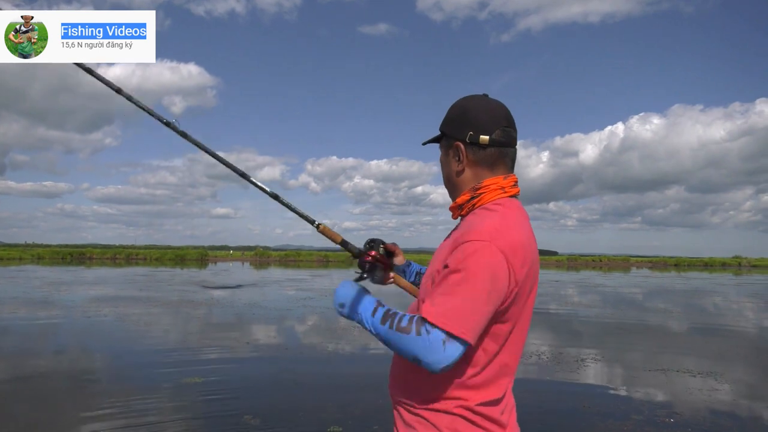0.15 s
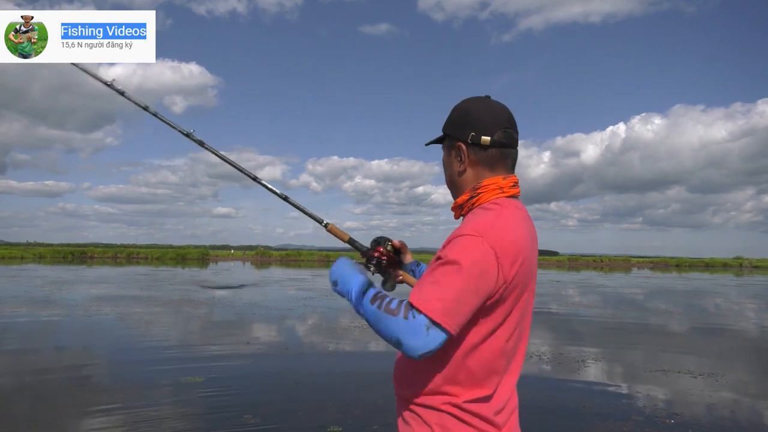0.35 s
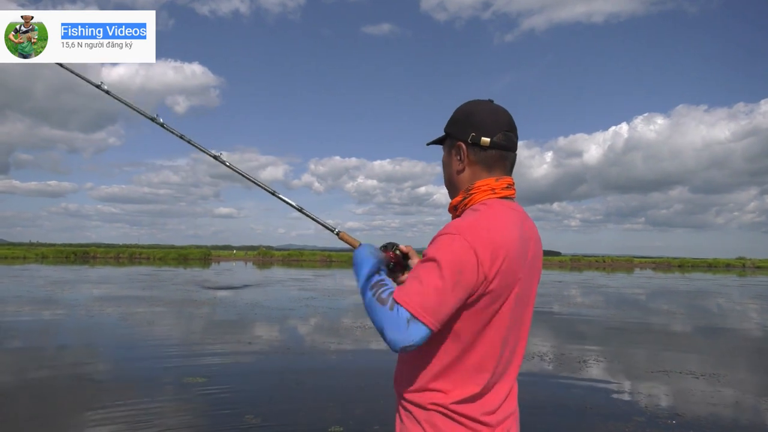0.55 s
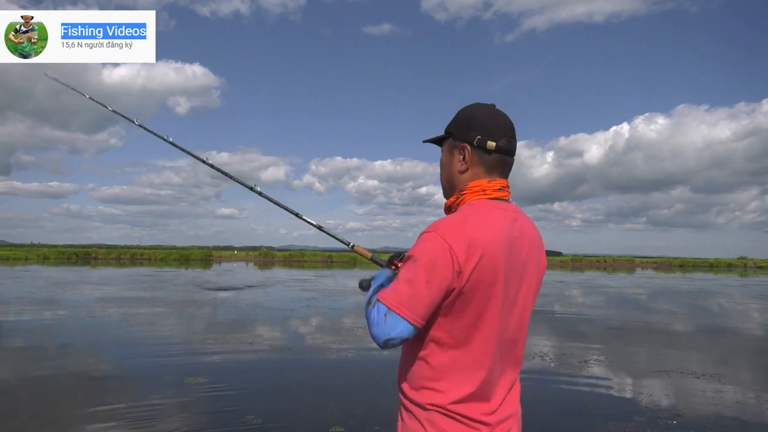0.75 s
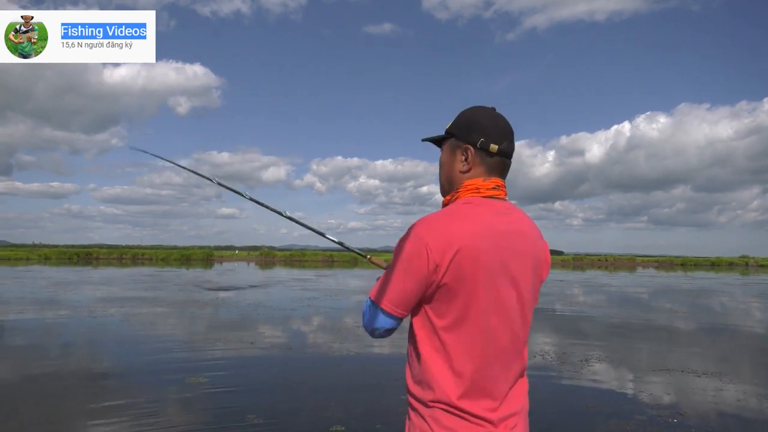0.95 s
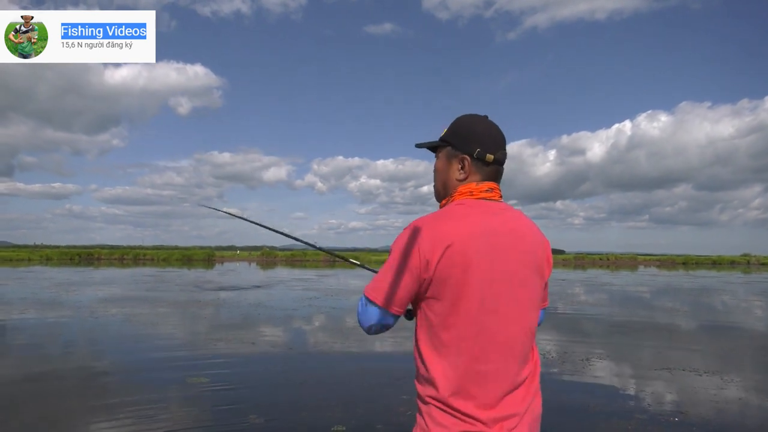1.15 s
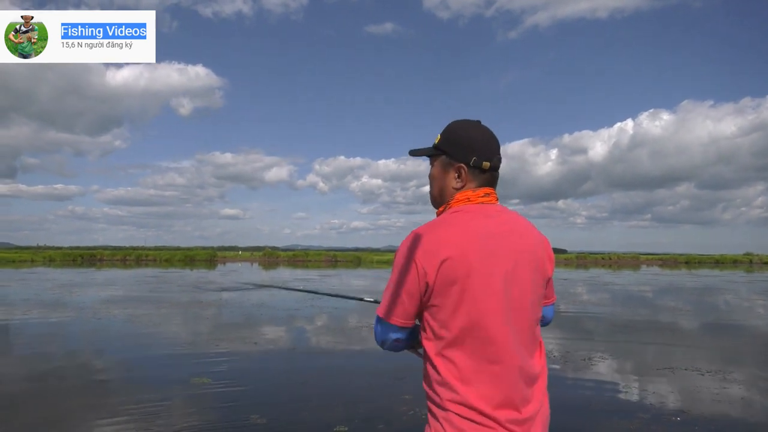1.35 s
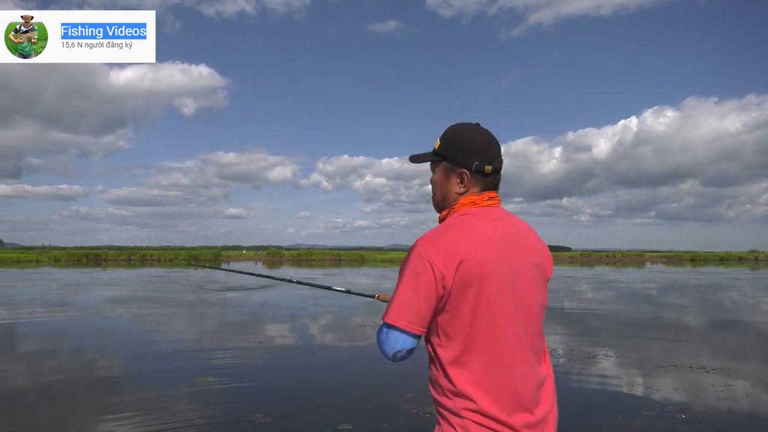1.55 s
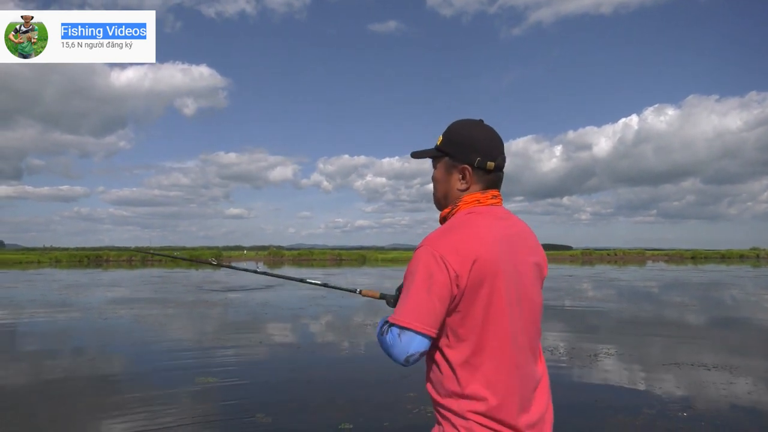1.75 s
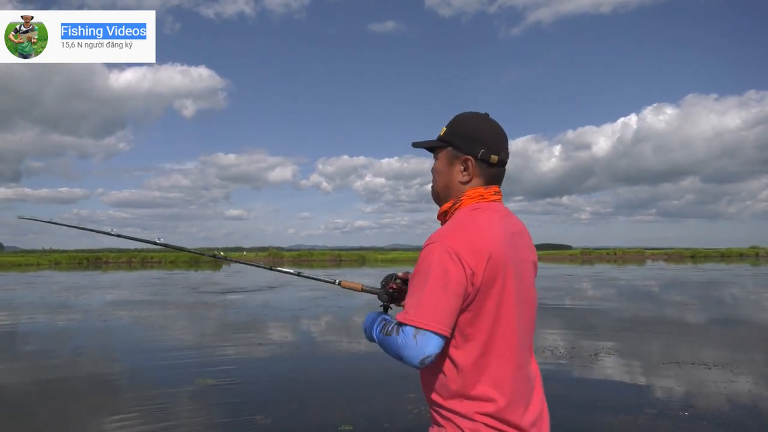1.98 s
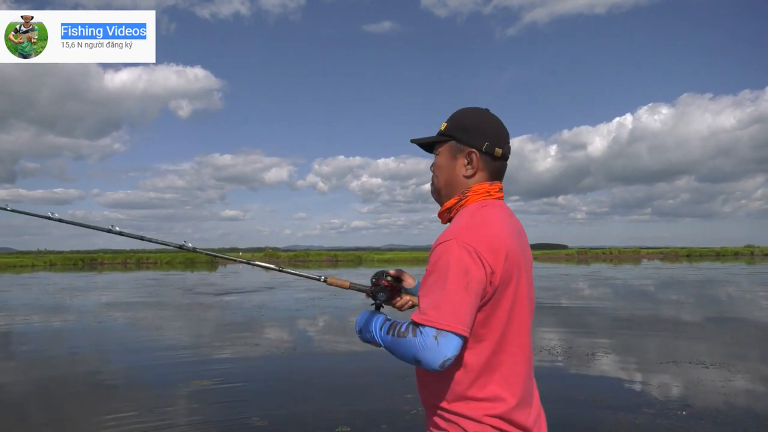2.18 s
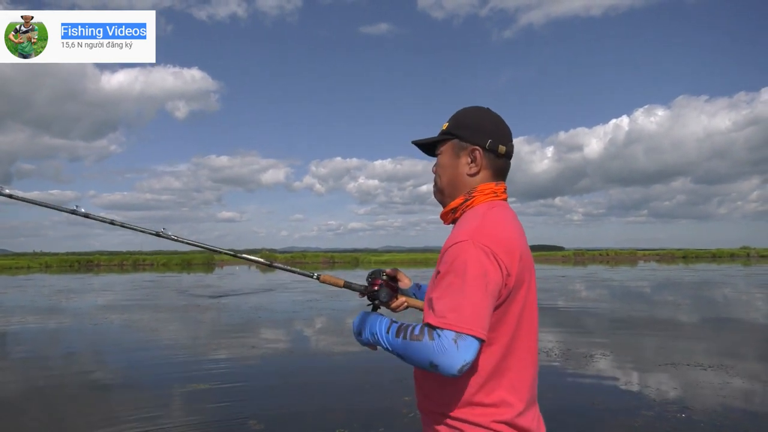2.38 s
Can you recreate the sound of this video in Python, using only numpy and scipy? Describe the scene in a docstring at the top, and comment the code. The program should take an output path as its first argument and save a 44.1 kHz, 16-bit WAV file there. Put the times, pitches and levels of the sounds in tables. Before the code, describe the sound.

A wooden pole knocks and rubs against a small boat on calm shallow water, with soft plops

```python
"""Outdoors on calm, shallow water, a pole is worked from a small boat close by.
Knocks, two firm and then lighter ones, ring decaying modes of pole and hull; clicks are short coloured cracks.
Uneven rubbing is a stream of grains, with one hard scrape, thin gliding squeals and a faint late swish.
Water plops and low hull thuds are brief hollow notes; coarser grains slosh over a faint open-air hush of noise."""
import sys
import numpy as np
from scipy import signal
from scipy.fft import irfft
from scipy.io import wavfile
from scipy.ndimage import uniform_filter1d

SR = 44100
rng = np.random.default_rng(int(sys.argv[2]) if len(sys.argv) > 2 else 0)


def master(y):
    """Save y as 16-bit WAV."""
    cut = np.clip(np.atleast_2d(y).T, -1, 1)
    pcm = np.round(cut * 32767)  # scale
    wavfile.write(sys.argv[1], SR, pcm.astype(np.int16))


N = 110250  # samples, 2.5 s

# Blows of the pole on the boat. Each row: start in seconds, drive of the pole's ring in dB,
# drive of the hull's boom in dB, factor on the ring times.
BLOWS = [(0.457, -19.5, -53, 1.05), (0.8069, -29, -34, 0.74), (0.833, -57, -36, 0.29),
         (1.592, -36, -45.5, 0.48), (1.602, -42.5, -60.5, 0.89), (2.4758, -35.5, -58, 0.41)]
# Ringing modes of the pole. Each row: pitch in Hz, relative level in dB,
# seconds to fall 60 dB before the blow's factor.
POLE_MODES = [(261, -2, 0.069), (366, -2.5, 0.035), (633, -17.5, 0.068), (986, -13, 0.038),
              (1200, -32, 0.05), (1535, -19, 0.06), (1695, -35, 0.018), (2013, -28.5, 0.081),
              (3150, -30.5, 0.038)]
# Booming modes of the hull. Each row: starting pitch in Hz, relative level in dB,
# seconds to fall 60 dB before the blow's factor.
HULL_MODES = [(143, -5, 0.25), (208.7, 1.5, 0.18), (302, -5, 0.22), (461.4, 2.5, .11), (615, -20, 0.29)]
HULL_SAG_PER_S = 1.88  # the hull's pitch sinks as the pressure eases (share per second)


def knocks():
    """Each blow rings the pole and the hull in its own proportion."""
    out = np.zeros((2, N))
    for start, pole_db, hull_db, ring_factor in BLOWS:
        pole = amp(pole_db) * ring(POLE_MODES, ring_factor)
        hull = amp(hull_db) * ring(HULL_MODES, ring_factor, HULL_SAG_PER_S)
        add(out, start, pole + hull)
    return out


BUILD_CYCLES = 0.65  # periods a mode needs to swell
MODE_SCATTER = 0.15  # gain of the irregular rattle beside each mode's steady tone


def ring(modes, ring_factor, sag=0):
    """Modes swell within a cycle and die away, each a little rattly and perhaps sinking in pitch."""
    t = np.arange(8192) / SR
    out = 0
    for k, (hz, db, t60) in enumerate(modes):
        rattle = burst(lambda f: peaks([(hz, hz / 4, 0)], f))[0]
        polarity = (-1) ** k  # neighbouring modes start in opposite directions
        tone = polarity * np.sin(2 * np.pi * hz * t * (1 - sag * t / 2))
        swell = 1 - np.exp(-(t * hz / BUILD_CYCLES) ** 2)
        decay = amp(db - 60 * t / (t60 * ring_factor))
        out = out + (tone + MODE_SCATTER * rattle) * decay * swell
    return out


# Hard snaps of the pole. Each row: start in seconds, level in dB before the decay,
# centre of the emphasis in Hz, its spread in octaves, decay time constant in seconds.
SNAPS = [(0.218, -43, 3150, 0.1, 0.0049), (0.242, -35.5, 6500, 0.95, 0.0021),
         (0.271, -33, 6600, 1.2, 0.003), (0.455, -38.5, 2090, 0.9, 0.0067),
         (0.5, -37.5, 3020, 0.27, 0.0023), (0.533, -39, 2200, 0.31, 0.00077),
         (0.782, -42, 2700, 0.92, 0.0051), (0.808, -38.5, 5200, 0.65, 0.0074),
         (1.293, -54.5, 1600, 2.5, 0.0062), (1.347, -55, 900, 2.2, 0.0045),
         (1.4163, -48.5, 690, 0.56, 0.0067), (1.593, -44, 700, 0.8, 0.0072),
         (1.6025, -50.5, 5100, 0.85, 0.0021), (1.83, -51.5, 844, 0.5, .005),
         (2.478, -47.5, 690, 0.36, 0.0049)]
# Resonances shared by all snaps. Each row: centre in Hz, width in Hz, relative level in dB.
SNAP_RESONANCES = [(1060, 2100, 2), (2880, 110, -2), (4670, 300, -0.5), (5280, 96, -0.5), (6310, 180, -4.5),
                   (8030, 810, -9.5), (10220, 850, -5)]
# Tiny bright ticks. Each row: start in seconds, level in dB before the decay,
# decay time constant in seconds.
TINY_TICKS = [(0.607, -46, .0004), (.631, -47, .001), (0.696, -51, .0008), (.7146, -39.5, 0.00087),
              (.7817, -45, .0005), (0.861, -51, 0.0009)]
# Spectrum of the ticks. Each row: frequency in Hz, relative level in dB per Hz.
TICK_SPECTRUM = [(5000, -35), (10300, 9), (12000, -8), (16000, -6)]


def clicks():
    """Short, hard snaps and tiny ticks as the pole slips and catches."""
    out = np.zeros((2, N))
    for start, db, centre_hz, octaves, decay_s in SNAPS:
        def snap_colour(hz):
            distance = np.log2((hz + 1) / centre_hz) / octaves
            return peaks(SNAP_RESONANCES, hz) * np.exp(-.5 * distance ** 2)
        add(out, start, amp(db) * snap(snap_colour, decay_s))
    for start, db, decay_s in TINY_TICKS:
        add(out, start, amp(db) * snap(lambda hz: amp(read(TICK_SPECTRUM, hz)), decay_s))
    return out


CLICK_RISE_S = 0.00018


def snap(gain, decay_s):
    """A coloured crack that rises almost at once and dies fast."""
    noise = burst(gain)
    t = np.arange(noise.shape[1]) / SR
    shape = np.minimum(t / CLICK_RISE_S, 1) * np.exp(-t / decay_s)
    return unit(noise * shape) * np.sqrt(np.mean(shape ** 2))


# Rubbing strokes as one level curve. Each row: time in seconds, level in dB.
RUB_LEVEL = [(0, -60.5), (.15, -56.5), (.21, -47.5), (.26, -59), (.285, -64.5), (.325, -47), (.365, -49),
             (.405, -64.5), (.45, -50.5), (.50, -51.5), (.55, -58.5), (.635, -51.5), (.665, -59.5),
             (.70, -49), (.74, -52), (.80, -55), (.89, -54.5), (.93, -61), (1.0, -54), (1.07, -69),
             (1.2, -60), (1.25, -66.5), (1.52, -75.5)]
# Spectrum of the rub. Each row: frequency in Hz, relative level in dB per Hz.
RUB_SPECTRUM = [(100, -59), (400, -6.5), (1000, -1), (2800, 1.5), (4000, -1.5), (4750, 1.5), (5500, -3.5),
                (7100, -7), (8000, -7), (9200, -11), (10200, -10.5), (11800, -16.5), (16000, -21.5)]
GRAINS_PER_S, GRAIN_SPREAD_DB, RUB_PATCHY_DB = 9000, 2, 3.5
# One hard, lower scrape.
SCRAPE_START_S, SCRAPE_LENGTH_S, SCRAPE_DB = 0.316, 0.06, -49.5
# Resonances of the scrape. Each row: centre in Hz, width in Hz, relative level in dB.
SCRAPE_RESONANCES = [(1202, 23, 7.5), (2124, 150, 4), (2970, 130, 1.5)]
# Squeals where the rub catches. Each row: start in seconds, length in seconds, highest pitch in Hz,
# level of that pitch in dB, level of its octave in dB.
SQUEAL_NOTES = [(0.624, 0.024, 2310, -58, -56), (0.687, 0.053, 2444, -62, -52.5),
                (0.845, 0.065, 2298, -55, -55), (0.975, 0.049, 2636, -58.5, -76)]
# A faint late swish as a level curve. Each row: time in seconds, level in dB.
SWISH_LEVEL = [(1.7, -80), (1.95, -68), (2.15, -72.5), (2.3, -70), (2.5, -72.5)]
# Spectrum of the swish. Each row: frequency in Hz, relative level in dB per Hz.
SWISH_SPECTRUM = [(500, -30), (2000, -2.5), (4900, 0.5), (6400, -6), (7700, -4), (10500, -10.5),
                  (16000, -45)]


def rubbing():
    """Grainy friction, with one hard scrape, thin squeals and a last faint swish."""
    slips = grains(GRAINS_PER_S, GRAIN_SPREAD_DB)
    out = level(RUB_LEVEL) * texture(slips, RUB_SPECTRUM, NEAR_LIKENESS, RUB_PATCHY_DB)
    add(out, SCRAPE_START_S, amp(SCRAPE_DB) * stroke(SCRAPE_LENGTH_S, SCRAPE_RESONANCES))
    for start, length, hz, pitch_db, octave_db in SQUEAL_NOTES:
        add(out, start, amp(pitch_db) * squeal(length, hz))
        add(out, start, amp(octave_db) * squeal(length, 2 * hz))
    noise = rng.standard_normal((2, N))
    swish = level(SWISH_LEVEL) * texture(noise, SWISH_SPECTRUM, NEAR_LIKENESS, patchy_db=3)
    return out + swish


def stroke(length, resonances):
    """Friction swells and fades through a few resonances."""
    sound = burst(lambda hz: peaks(resonances, hz))[:, :int(length * SR)]
    return unit(sound) * arch(sound.shape[1])


SQUEAL_WIDTH_HZ = 140  # width of the random waver
SQUEAL_ARCH = 0.0784  # pitch is lower by this share at both ends


def squeal(length, hz):
    """A thin, unsteady note whose pitch rises and falls with the speed of the slip."""
    swell = arch(int(length * SR))
    turns = np.cumsum(hz * (1 - SQUEAL_ARCH * (1 - swell))) / SR
    slow_noise = burst(lambda f: peaks([(0, SQUEAL_WIDTH_HZ, 0)], f))[0]
    waver = signal.hilbert(slow_noise)[:len(swell)]
    note = (waver * np.exp(-2j * np.pi * turns)).real
    return swell * unit(note)


# Water plops and dull hull thuds. Each row: time of the peak in seconds, level in dB, pitch in Hz,
# seconds from the peak until the swell has fallen to 1/e.
HOLLOW_NOTES = [(0.105, -37, 346, 0.0036), (0.279, -38, 294, 0.0072), (0.299, -43.5, 284, 0.013),
                (0.373, -42, 297, 0.0035), (0.501, -47.5, 264, 0.013), (0.531, -49, 180, 0.0082),
                (0.62, -41, 358, 0.0043), (.67, -56.5, 131, 0.038), (0.732, -42, 268, 0.0019),
                (.822, -35.5, 186, 0.0084), (.859, -41.5, 133, 0.0041), (1.069, -45.5, 297, 0.0058),
                (1.089, -52, 133, 0.021), (1.16, -48.5, 170, 0.0089), (1.395, -41, 330, 0.0023),
                (1.414, -47, 357, 0.0023), (1.424, -37.5, 310, 0.0041), (1.448, -41.5, 313, 0.0082),
                (1.468, -47, 336, 0.006), (1.482, -42, 340, 0.0024), (1.52, -57, 308, 0.022),
                (2.432, -43.5, 347, 0.0062), (2.46, -46.5, 346, 0.0037)]
SPLASH_HZ, SPLASH_WIDTH_HZ = 590, 260
SPLASH_DB = -15.5  # relative to the note


def plops_and_thuds():
    """Brief hollow notes with a soft noise: water plopping, and dull thuds of the hull after a knock."""
    out = np.zeros((2, N))

    def splash_colour(f):
        return peaks([(SPLASH_HZ, SPLASH_WIDTH_HZ, 0)], f) * (f / (f + SPLASH_HZ)) ** 2
    for peak_s, db, hz, half_s in HOLLOW_NOTES:
        splash = burst(splash_colour)
        t = (np.arange(splash.shape[1]) - splash.shape[1] / 2) / SR  # zero at the peak
        note = np.sin(2 * np.pi * hz * t)
        swell = np.exp(-(t / half_s) ** 2)
        add(out, peak_s + t[0], amp(db) * swell * (note + amp(SPLASH_DB) * splash))
    return out


# Sloshing along the hull as a level curve. Each row: time in seconds, level in dB.
SLOSH_LEVEL = [(0, -53.5), (.15, -61), (.5, -52.5), (.62, -64), (.85, -55.5), (.95, -59), (1.11, -53.5),
               (1.3, -56), (1.43, -53), (1.55, -63.5), (1.62, -57), (1.72, -67), (2.3, -66), (2.5, -61.5)]
# Spectrum of the slosh. Each row: frequency in Hz, relative level in dB per Hz.
SLOSH_SPECTRUM = [(30, -10), (70, -13.5), (135, -3), (300, -1), (500, -5.5), (800, -11.5), (1500, -20),
                  (4000, -31.5), (16000, -40.5)]


def sloshing():
    """Sparse random grains, coloured low, make a lumpy slosh."""
    lumps = grains(per_s=2500, spread_db=1.5)
    return level(SLOSH_LEVEL) * texture(lumps, SLOSH_SPECTRUM, NEAR_LIKENESS, patchy_db=2)


# Spectrum of the open air. Each row: frequency in Hz, relative level in dB per Hz.
AIR_SPECTRUM = [(30, -20), (140, -2.5), (400, -4.5), (800, -6), (1300, -13), (6000, -22.5), (15500, -27.5)]
# Stereo width of the air. Each row: frequency in Hz, left-right likeness from -1 to 1.
AIR_LIKENESS = [(400, 0.82), (1000, 0.51), (2400, -0.59), (15000, -0.23)]
AIR_DB = -61.5


def open_air():
    """Wide shaped noise gives the faint hush of open air at one overall level."""
    noise = rng.standard_normal((2, N))
    return amp(AIR_DB) * texture(noise, AIR_SPECTRUM, AIR_LIKENESS, patchy_db=-1.5)


DECK_T60_S = 0.042  # time the reflections take to fall 60 dB


def deck(x):
    """Brief scattered reflections from the inside of the boat, as a decaying noise tail."""
    t = np.arange(8192) / SR
    tail = rng.standard_normal((2, len(t))) * amp(-60 * t / DECK_T60_S)
    tail = tail * (t > .003)  # nothing returns in the first 3 ms
    return signal.fftconvolve(x, tail / np.linalg.norm(tail[0]), axes=1)[:, :N]


def texture(drive, colour, likeness, patchy_db):
    """Colours two drives, with patches that drift in time and frequency."""
    hz, _, z = signal.stft(drive, SR, nperseg=1024, noverlap=768)
    patches = rng.standard_normal(z.shape[1:])
    patches = uniform_filter1d(patches, size=6, axis=0)  # across frequency
    patches = unit(uniform_filter1d(patches, size=8, axis=1))  # across time
    gain = amp(read(colour, hz)[:, None] + patchy_db * patches)
    z = pair(*z, read(likeness, hz)[:, None]) * gain
    return unit(signal.istft(z, nperseg=1024, noverlap=768)[1][:, :N])


def grains(per_s, spread_db):
    """Sparse random impulses of uneven size on two channels."""
    size = amp(spread_db * np.minimum(rng.exponential(1, N), 4))
    return rng.standard_normal((2, N)) * size * (rng.random(N) < per_s / SR)


# Stereo width of the close sounds. Each row: frequency in Hz, left-right likeness from -1 to 1.
NEAR_LIKENESS = [(400, 0.98), (1200, 0.88), (7000, 1), (10000, 0.11)]


def burst(gain, size=8192):
    """A short stereo noise coloured by gain(hz), rms 1."""
    hz = np.fft.rfftfreq(size, 1 / SR)
    a, b = np.exp(2j * np.pi * rng.random((2, len(hz))))
    return unit(irfft(pair(a, b, read(NEAR_LIKENESS, hz)) * gain(hz)))


def pair(a, b, likeness):
    """Two channels of a given likeness from two unrelated signals."""
    c = np.clip(likeness, -1, 1)
    mid = np.sqrt((1 + c) / 2) * a
    side = np.sqrt((1 - c) / 2) * b
    return np.array([mid + side, mid - side])


def peaks(table, hz):
    """Summed gain of a set of resonances."""
    return sum(amp(db) / (1 + ((hz - f) / width) ** 2 * 2) for f, width, db in table)


def arch(size):
    """A rounded swell from 0 to 1 and back."""
    return np.sin(np.linspace(0, np.pi, size)).clip(0) ** .5


def amp(db):
    """Decibels to gain."""
    return 10 ** (np.asarray(db) / 20)


def unit(x):
    """Scales to rms 1."""
    return x / np.sqrt(np.mean(x ** 2) + 1e-20)


def read(points, hz):
    """Reads a spectrum on a log-frequency axis."""
    f, value = np.transpose(points)
    return np.interp(np.log(hz + 1), np.log(f), value)


def level(points):
    """A dB curve as a gain for every sample."""
    return amp(np.interp(np.arange(N) / SR, *np.transpose(points)))


def add(mix, s, sound):
    """Adds a sound to the mix at time s."""
    part = mix[:, max(round(s * SR), 0):][:, :sound.shape[-1]]
    part += sound[..., :part.shape[1]]


LEFT_DB = 0.2  # low sounds are raised this much on the left and lowered as much on the right
DECK_DB = -24.5


def scene():
    """Pole, boat and water, close to the middle."""
    low = knocks() + plops_and_thuds()
    sharp = clicks()
    balance = amp([[LEFT_DB], [-LEFT_DB]])
    body = (low + sloshing() + open_air()) * balance
    return body + sharp + rubbing() + amp(DECK_DB) * deck(low + sharp)


LOW_CUT_HZ, EDGE_HZ = 95, 15900


def record(dry):
    """The microphone's bass cut, then the recorder's steep upper band limit."""
    bass_cut = signal.butter(2, LOW_CUT_HZ, "highpass", fs=SR, output="sos")
    thin = signal.sosfilt(bass_cut, dry)
    band_limit = signal.firwin(511, EDGE_HZ, window=("kaiser", 9), fs=SR)
    return signal.oaconvolve(thin, band_limit[None], "same")


dry = scene()
out = record(dry)
master(out)
```